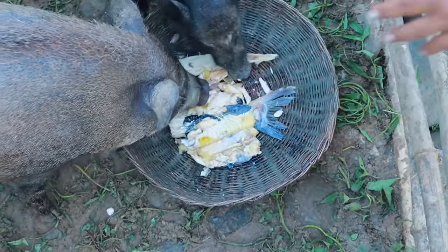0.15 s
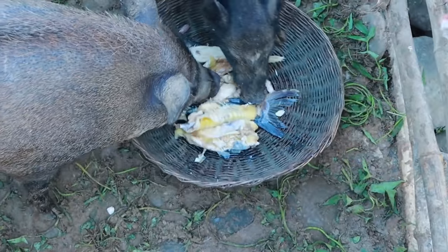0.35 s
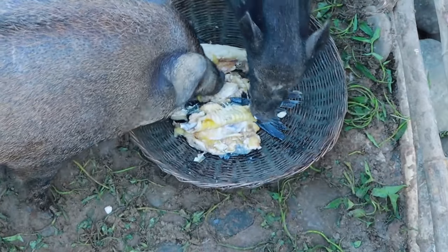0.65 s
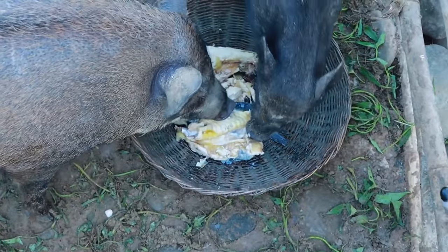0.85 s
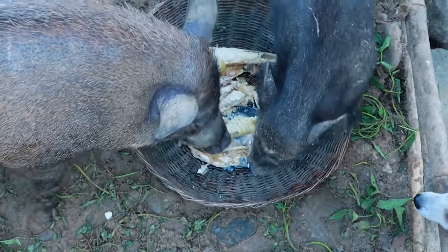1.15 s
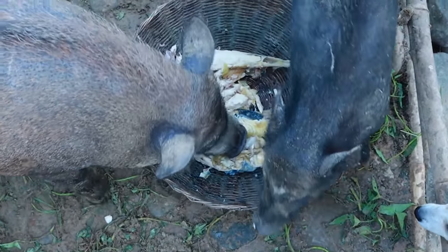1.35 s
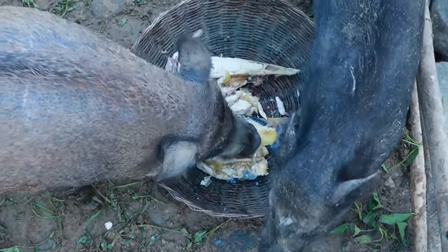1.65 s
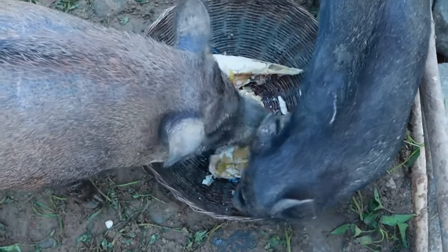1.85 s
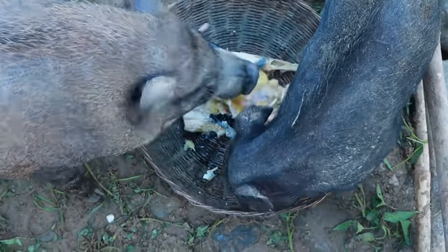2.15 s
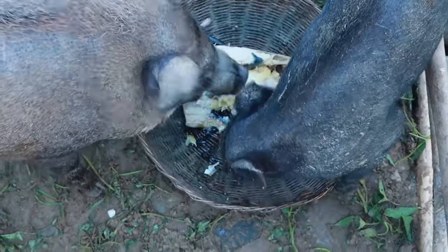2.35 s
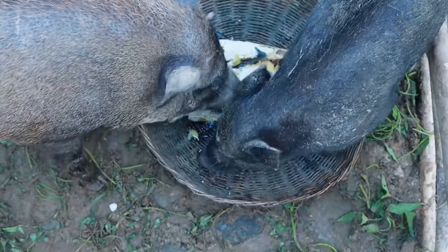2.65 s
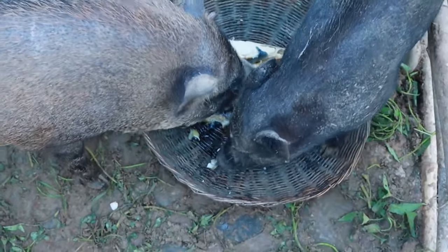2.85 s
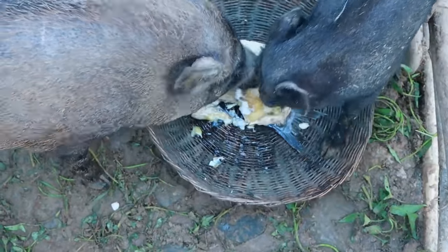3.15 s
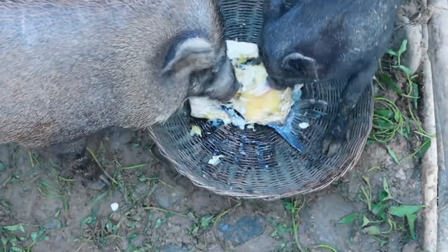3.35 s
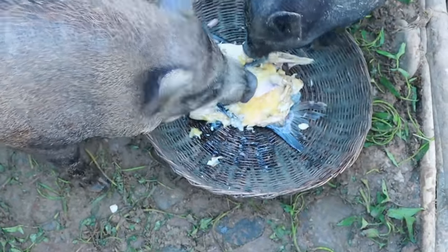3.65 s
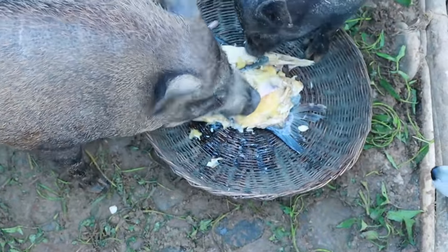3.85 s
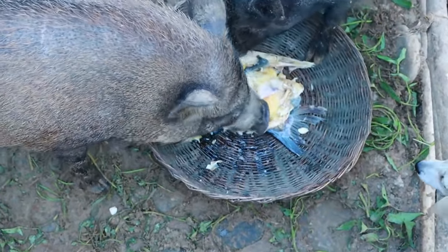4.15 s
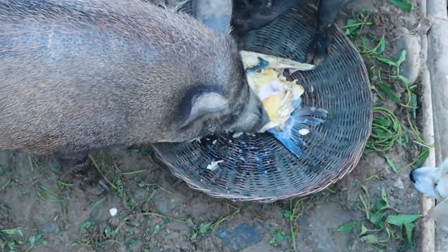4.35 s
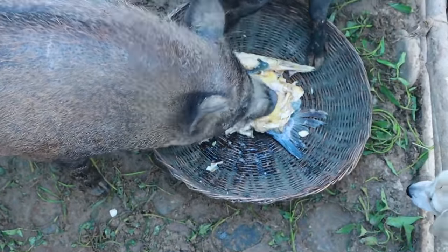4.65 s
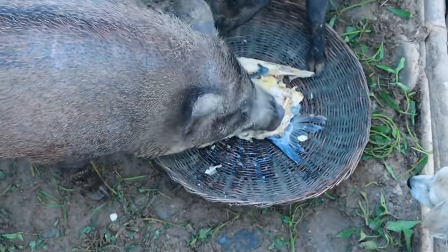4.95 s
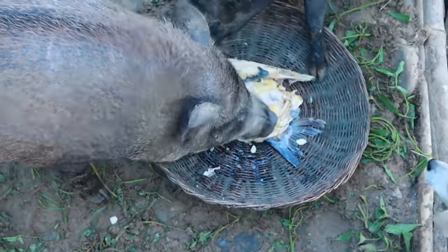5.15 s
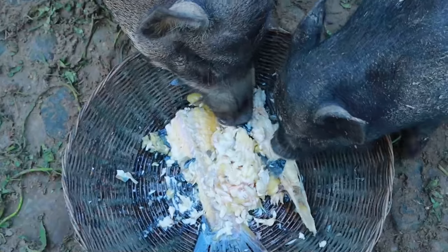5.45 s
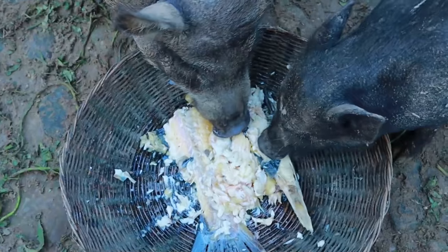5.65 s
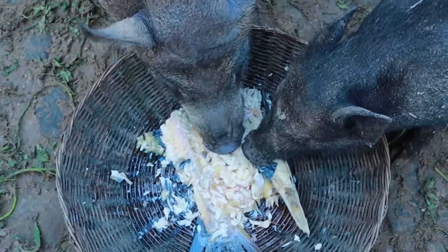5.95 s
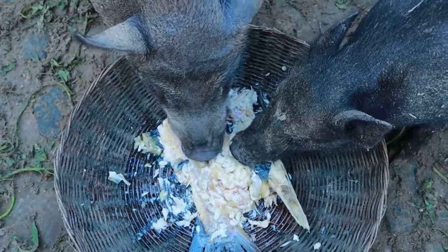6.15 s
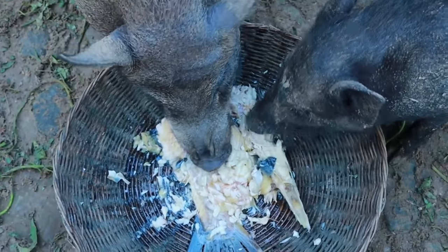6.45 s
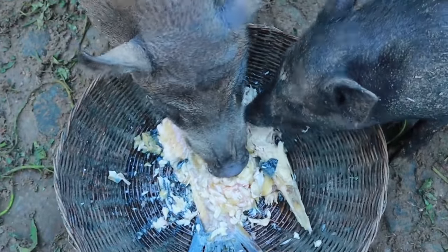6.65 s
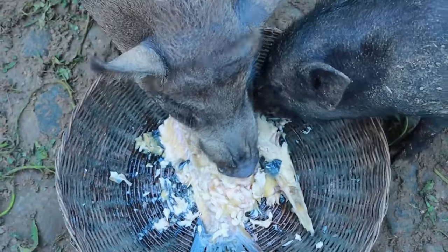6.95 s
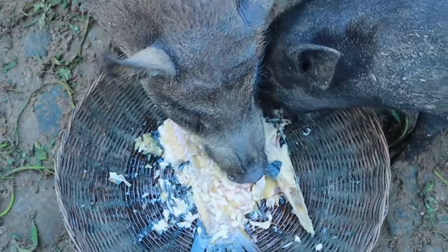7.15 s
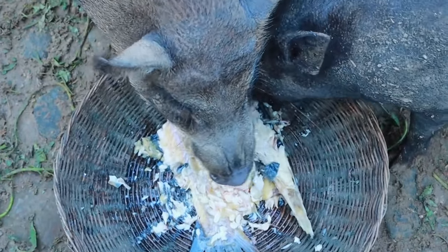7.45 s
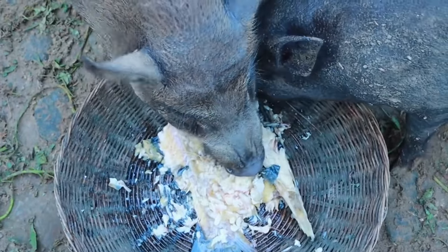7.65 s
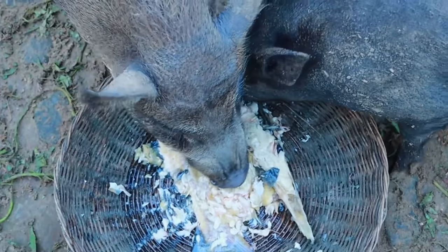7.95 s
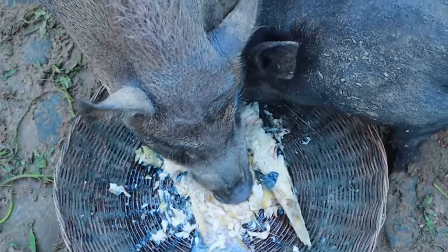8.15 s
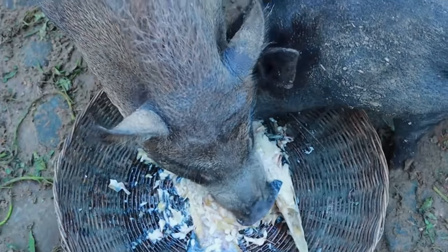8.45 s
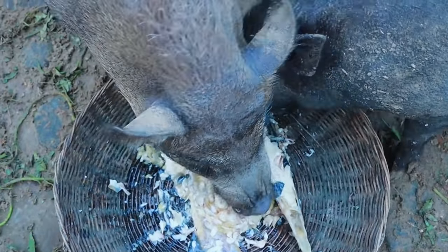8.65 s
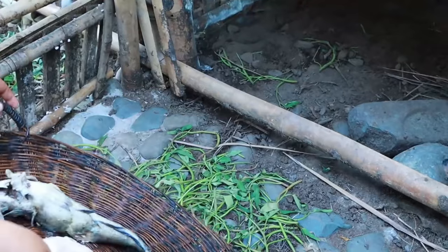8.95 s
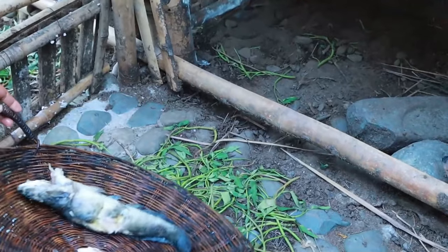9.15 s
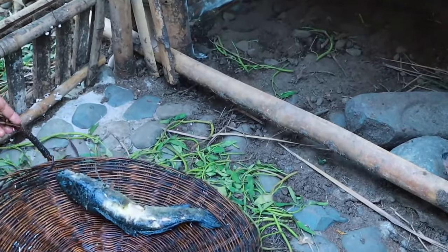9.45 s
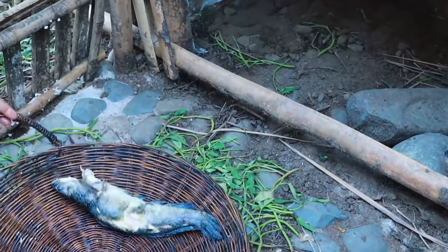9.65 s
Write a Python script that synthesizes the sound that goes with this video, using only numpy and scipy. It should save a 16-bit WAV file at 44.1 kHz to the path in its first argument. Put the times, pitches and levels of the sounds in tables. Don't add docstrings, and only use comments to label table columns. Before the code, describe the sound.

Two pigs chew wet mash with sharp, irregular smacks and slurps while a nearby dog whines in thin, hissing whistles over a soft outdoor wash.

```python
import sys
import numpy as np
from scipy import signal
from scipy.fft import rfft, irfft
from scipy.io import wavfile
from scipy.ndimage import uniform_filter1d

SR = 44100
rng = np.random.default_rng(int(sys.argv[2]) if len(sys.argv) > 2 else 0)


def materialize(psi):
    bounded = np.clip(np.atleast_2d(psi).T, -1, 1)
    quanta = np.round(bounded * 32767).astype(np.int16)
    wavfile.write(sys.argv[1], SR, quanta)


def ratio_of_db(decibels):
    return 10 ** (np.asarray(decibels, float) / 20)


N = 432180

SQUEAK_SECOND_DB, YIP_SECOND_DB = -36.5, -1


def evened(x):
    return x / np.sqrt(np.mean(abs(x) ** 2) + 1e-20)


def read(points, hz):
    f, value = np.transpose(points)
    return np.interp(np.log(hz + 1), np.log(f + 1), value)


def add(mix, s, sound):
    part = mix[round(s * SR):][:len(sound)]
    part += sound[:len(part)]


def wobble(size, width_hz):
    pole = np.exp(-np.pi * width_hz / SR)
    z = rng.standard_normal((size + 500, 2)) @ [1, 1j]
    once = signal.lfilter([1], [1, -pole], z)
    return evened(signal.lfilter([1], [1, -pole], once)[500:])


def coloured(x, points):
    gain = ratio_of_db(read(points, np.fft.rfftfreq(len(x), 1 / SR)))
    return irfft(rfft(x) * gain, len(x))


def band(x, lo_hz, hi_hz):
    return signal.sosfilt(signal.butter(2, [lo_hz, hi_hz], "band", fs=SR, output="sos"), x)


def smack(s, crack_db, pop_db, fizz_db):
    t = np.arange(2000) / SR
    noise, grit = rng.standard_normal(len(t)), rng.exponential(1, len(t))
    bubble_hz = np.clip(1597 - 95 * pop_db, 1300, 4500) * 2 ** (0.35 * rng.random())
    snaps = uniform_filter1d(grit ** 2.6, size=24) + 12 * np.exp(-t / 0.0013)
    tear = noise * snaps * (1 - np.exp(-t / 0.0023))
    crack = band(tear * ratio_of_db(-60 * t / 0.052), 1530, 5350)
    crack = evened(crack) + 0.4 * evened(band(crack, 0.65 * bubble_hz, 1.22 * bubble_hz))
    fizz = band(tear * ratio_of_db(-60 * t / 0.018), 4500, 13300)
    cavity = np.sin(2 * np.pi * rng.uniform(740, 1170) * t) * t * ratio_of_db(-60 * t / 0.0099)
    pop = cavity + 0.0004 * band(noise * ratio_of_db(-60 * t / 0.079), 360, 960)
    parts = crack / abs(crack).max()
    parts += ratio_of_db(pop_db + 0.5) * pop / abs(pop).max()
    parts += ratio_of_db(fizz_db + 14) * fizz / abs(fizz).max()
    return s - .001, ratio_of_db(crack_db) * parts


def mouthfuls():
    # start_s, peak_db
    bites = [(0.365, -12), (1.2523, -15.5), (2.37, -16), (3.769, -3), (3.8186, -12), (3.959, -12.5),
             (4.4876, -7.5), (4.728, -16.5), (4.9988, -13.5), (5.0713, -16), (5.2392, -6), (5.4204, -13.5),
             (5.7743, -16), (5.8941, -8), (6.1599, -15), (6.319, -16), (6.6358, -9), (6.8165, -16),
             (7.096, -16.5), (7.1644, -11.5), (7.3298, -10.5), (7.355, -24), (7.3846, -11), (7.6014, -9),
             (7.7402, -11.5), (7.8104, -16), (7.9834, -12), (7.9997, -16), (8.2945, -14.5), (8.5202, -11.5)]
    # start_s, peak_db, mouth_pop_db
    lip_pops = [(0.3342, -12.5, -4.5), (0.3854, -15.5, -3), (0.414, -16, 6.5), (1.04, -18.5, 8),
                (1.9111, -11.5, -5), (2.204, -19, -5), (2.2854, -7, -7.5), (2.4897, -15, 0),
                (2.9736, -20, 3), (3.1712, -15, -7.5), (3.23, -17, 3.5), (3.7387, -16, -1),
                (3.7814, -23, 3), (3.9305, -16, -3), (3.9749, -9, -6), (3.9976, -9.5, 0.5),
                (4.0198, -18, 4), (4.6436, -16.5, -8), (4.7694, -5.5, -14), (4.7812, -14.5, 7),
                (5.018, -16.5, 5.5), (5.4323, -9.5, -9.5), (6.6107, -17, -5), (6.6495, -12.5, -1.5),
                (7.676, -6, -5.5), (7.694, -4.5, -4), (7.8912, -6, -6.5), (7.9134, -14.5, -0.5),
                (9.1686, -15.5, -8.5), (9.4621, -14, -3)]
    # start_s, peak_db
    slurps = [(0.327, -20), (0.9142, -21), (1.0884, -22), (1.7636, -10), (1.7734, -25), (1.905, -16),
              (4.0044, -9.5), (5.2546, -13), (5.7006, -14.5), (5.8087, -24), (7.8997, -26), (8.7221, -17.5),
              (9.7228, -22.5)]
    dry_fizz_db, wet_fizz_db, fizz_spread_db = -27.5, -20.5, 4.5
    bite_pop_db, slurp_pop_db = -15.5, -3
    rows = [(s, db, bite_pop_db, dry_fizz_db) for s, db in bites]
    rows += [(*row, dry_fizz_db) for row in lip_pops]
    rows += [(s, db, slurp_pop_db, wet_fizz_db) for s, db in slurps]
    chance = rng.standard_normal((len(rows), 1))
    rows = np.array(rows) + fizz_spread_db * chance * [0, 0, 0, 1]
    return [smack(*row) for row in rows]


def chewing():
    # time_s, level_db
    mash_course = [(0, -38), (1.2, -38), (2.9, -37.5), (4.3, -37), (5.5, -36.5), (6.5, -36), (6.95, -32.5),
                   (7.5, -33.5), (8.5, -33), (8.9, -41), (9.8, -42.5)]
    # pitch_hz, level_db
    bubble_sizes = [(2200, -5), (3600, -14.5), (5500, -11.5), (8500, -23), (11000, -24)]
    # frequency_hz, level_db
    mash_spectrum = [(300, -43), (900, 11), (2000, -1), (3500, -0.5), (6000, -7.5), (10000, -23.5),
                     (16000, -24.5)]
    s, level_db = np.transpose(mash_course)
    clumps = ratio_of_db(7.3 * wobble(N, 34).real + 1.9 * wobble(N, 230).real)
    mash = evened(coloured(rng.standard_normal(N) * clumps, mash_spectrum))
    burst = np.exp(-np.arange(200) / 55.0)
    spit = np.zeros(N)
    for hz, db in bubble_sizes:
        strength = ratio_of_db(5.8 * np.minimum(rng.exponential(1, N), 2.4))
        ticks = (rng.random(N) < 22 / SR) * strength
        bursts = signal.oaconvolve(ticks, burst)[:N] * rng.standard_normal(N)
        spit += ratio_of_db(db) * evened(band(bursts, 0.55 * hz, 1.22 * hz))
    return ratio_of_db(np.interp(np.arange(N) / SR, s, level_db)) * (mash + spit)


def thuds():
    # start_s, peak_db, pitch_hz
    rings = [
        (2.489, -54, 328),
        (3.994, -14, 208),
        (4.78, -28, 362),
        (5.766, -24, 214),
        (7.673, -22.5, 250),
        (7.68, -13, 1560),
        (7.697, -8, 1350),
        (9.464, -19, 1500),
    ]
    t = np.arange(4000) / SR
    return [(s, ratio_of_db(peak_db - 60 * t / 0.06 * (hz / 250) ** 0.31) * np.sin(2 * np.pi * hz * t))
            for s, peak_db, hz in rings]


def grunt():
    # time_s, level_db, pitch_hz
    grunt_course = [
        (5.139, -45, 204),
        (5.186, -23.5, 211.4),
        (5.24, -36, 260),
    ]
    s, level_db, hz = np.transpose(grunt_course)
    t = np.arange(s[0], s[-1], 1 / SR)
    a = 2 * np.pi * np.cumsum(np.interp(t, s, hz)) / SR
    note = np.cos(a) + 0.51 * np.cos(1.5 * a) + 0.29 * np.cos(4 * a) + 0.17 * np.cos(3 * a)
    return s[0], 1.36 * ratio_of_db(np.interp(t, s, level_db)) * note * signal.windows.tukey(len(t), .3)


def arch(start, brk, land, hold_db, glide_db, first_hz, top_hz, land_hz, hoarse, half_db):
    climb_s, clearing_s, tail_s = .035, .019, .025
    s = np.arange(start, land + tail_s, .002)
    climb = 1 - np.exp(-(np.minimum(s, brk) - start) / climb_s)
    climb /= 1 - np.exp(-(brk - start) / climb_s)
    fall = np.sin(np.pi / 2 * np.clip((s - brk) / (land - brk), 0, 1)) ** 2
    hz = first_hz + (top_hz - first_hz) * climb + (land_hz - top_hz) * fall
    clears = brk + np.clip(.045 * (half_db + 7.5), 0, .55) * (land - brk)
    peak = clears + .3 * (land - clears)
    settle = clears + .68 * (land - clears)
    level_db = np.interp(s, [start, start + 1.08 * climb_s, clears - clearing_s, peak, land, s[-1]],
                         [hold_db - 4.5, hold_db, hold_db, glide_db, glide_db - 4.5, glide_db - 31.5])
    clear = hoarse * .021 * max(-8 - glide_db, 0)
    loose = clear + .035 * max(half_db + 9.5, 0)
    rough = np.interp(s, [clears - clearing_s, clears + clearing_s / 2, settle, land, s[-1]],
                      [hoarse, clear, clear, loose, .8])
    half_hold_db, half_glide_db = -10, -22
    held_db = half_glide_db + hoarse * (half_hold_db - half_glide_db)
    half = half_db + np.interp(s, [clears - clearing_s, clears, settle, land],
                               [held_db, half_glide_db, half_glide_db, 0])
    return np.transpose([s, hz, level_db, rough, half])


def whine(rows):
    sidebands_db = [12, 16.5, 15, 4, 3.5, 0.5, -1.5, -1, -4.5]
    lowest_share, step_share = .72, .165
    s, *columns = np.transpose(rows)
    t = np.arange(s[0], s[-1], 1 / SR)
    hz, level_db, rough, half_db = (np.interp(t, s, c) for c in columns)
    rough, size = np.clip(rough, 0, 1), len(t)
    shake = (.008 + .09 * rough) * wobble(size, 200).real
    a = np.pi * np.cumsum(hz * (1 + shake)) / SR
    flutter = ratio_of_db(np.minimum((3.0 + 4.0 * rough) * wobble(size, 80).real, 5))
    clean = np.cos(2 * a) + ratio_of_db(-28.0) * np.cos(4 * a) + ratio_of_db(-41) * np.cos(3 * a)
    clean += ratio_of_db(half_db - 3.2 * rough) * np.cos(a)
    clean *= flutter * (1 + .4 * wobble(size, 500).real)
    b = 2 * np.pi * np.cumsum(hz) / SR
    smear = np.zeros(size, complex)
    for k, db in enumerate(sidebands_db):
        line = np.exp(1j * b * (lowest_share + step_share * k)) * wobble(size, 650)
        smear += ratio_of_db(db + 3.5 * wobble(size, 50).real) * line
    half = ratio_of_db(half_db + 1.8 * wobble(size, 90).real) * np.exp(1j * a) * wobble(size, 880)
    rasp = ratio_of_db(2.8 * wobble(size, 150).real)
    steady = (1 - rough) ** 2
    voice = np.sqrt(2) * (steady * clean + rough * rasp * (evened(smear) + half).real)
    return s[0], ratio_of_db(level_db) * voice * signal.windows.tukey(size, .025 * SR / size)


def whines():
    # start_s, pitch_break_s, glide_landing_s, held_level_db, glide_level_db
    efforts = [(0.399, 0.48, .527, -24.5, -13.5), (1.08, 1.131, 1.14, -27.5, -14.5),
               (1.13, 1.14, 1.162, -17, -14), (1.72, 1.787, 1.84, -23.5, -18),
               (2.205, 2.277, 2.34, -22, -14.5), (2.36, 2.447, 2.53, -19, -13.5),
               (2.524, 2.634, 2.705, -18, -15.5), (2.699, 2.717, 2.765, -15, -16),
               (2.749, 2.832, 2.895, -15.5, -17.5), (3.543, 3.603, 3.635, -20.5, -15),
               (3.626, 3.674, 3.69, -24.5, -37), (4.486, 4.541, 4.645, -17.5, -18.5),
               (4.859, 4.912, 5.02, -25.5, -30), (5.186, 5.276, 5.36, -22, -20),
               (5.573, 5.612, 5.645, -24, -21.5), (5.894, 5.948, 6.0, -21, -16),
               (6.342, 6.39, 6.45, -24.5, -20), (6.654, 6.698, 6.765, -24, -23),
               (7.145, 7.202, 7.275, -32, -17.5), (7.601, 7.666, 7.73, -21.5, -18),
               (8.097, 8.159, 8.228, -21, -16), (8.811, 8.848, 8.93, -34.5, -23.5),
               (8.78, 8.803, 8.82, -27.5, -29), (4.931, 4.965, 4.98, -32, -40)]
    # first_hz, top_hz, landing_hz, hoarseness (0-1), half_pitch_line_at_landing_db
    fold_states = [(4900, 7000, 5100, 1.05, -17), (6900, 6600, 6300, 0.87, -25),
                   (5440, 5400, 4850, 0.5, -6), (4500, 6100, 4900, .85, 6), (5000, 7150, 4900, 0.96, -20),
                   (5630, 8100, 7500, 0.83, -17), (7360, 7700, 6800, 0.79, -25), (6800, 6780, 6770, 0, -34),
                   (6800, 7700, 4200, 0.5, -10), (3910, 5600, 4900, 0.73, 0.5),
                   (5900, 5700, 7400, 1.02, 15.5), (4600, 5800, 4300, 0.88, -0.5),
                   (4800, 6000, 4600, 1.02, 4), (6210, 6300, 4450, 0.79, 7.5), (5400, 5420, 4300, .15, 11),
                   (4430, 4950, 4600, 0.76, 3), (4200, 4600, 4400, 0.83, 10.5),
                   (5220, 7380, 4600, 0.8, 6.5), (5000, 7800, 4900, 1, 4), (3950, 7100, 4550, .95, -12),
                   (3690, 7900, 4500, 0.84, -8.5), (6550, 7400, 4700, 0.84, -4.5),
                   (5970, 6200, 6400, 0.43, -20), (5900, 5700, 5300, 0.97, 24)]
    return [whine(arch(*effort, *state)) for effort, state in zip(efforts, fold_states)]


def squeak(s, length, start_hz, end_hz, level_db, second_db):
    u = np.linspace(0, 1, round(length * SR))
    hz = (start_hz + (end_hz - start_hz) * u) * (1 + 0.016 * wobble(len(u), 110).real)
    turn = np.exp(2j * np.pi * np.cumsum(hz) / SR)
    note = turn + ratio_of_db(second_db) * turn ** 2 + ratio_of_db(second_db - 10) * turn ** 3
    note = note + ratio_of_db(.4 * second_db) * note * wobble(len(u), 700)
    level = ratio_of_db(level_db + 3.5 * wobble(len(u), 100).real)
    return s, np.sqrt(2) * level * note.real * signal.windows.tukey(len(u), .3)


def squeaks_and_yips():
    # start_s, length_s, start_hz, end_hz, level_db
    thin_squeaks = [(1.155, 0.033, 2726, 2500, -12.5), (1.198, 0.013, 2650, 2620, -43),
                    (3.578, 0.027, 7840, 7800, -34), (3.618, 0.017, 7400, 7260, -33),
                    (3.623, 0.066, 3336, 2980, -19), (6.246, 0.15, 3320, 3060, -36.5),
                    (6.569, 0.078, 3730, 3310, -32.5), (6.406, 0.038, 6840, 6740, -31),
                    (7.266, 0.028, 3200, 2940, -27), (7.579, 0.032, 3170, 3240, -31),
                    (7.604, 0.13, 3475, 3320, -33.5), (7.918, 0.1, 3460, 3180, -33.5),
                    (8.101, 0.063, 1345, 1210, -32), (8.189, 0.044, 1180, 1100, -20),
                    (8.317, 0.07, 1323, 1265, -27.5), (8.393, 0.054, 2970, 2580, -30),
                    (8.569, 0.048, 1135, 1056, -25), (9.676, 0.068, 4600, 4500, -45),
                    (1.725, 0.017, 4500, 5200, -27), (2.362, 0.016, 5400, 7500, -20),
                    (2.86, 0.029, 5900, 4260, -16.5), (3.56, 0.028, 4200, 5000, -24.5),
                    (8.102, 0.032, 4200, 4900, -23.5), (5.905, 0.026, 2350, 2440, -21.5)]
    # start_s, length_s, start_hz, end_hz, level_db
    reedy_yips = [(3.629, 0.06, 2315, 1550, -32.5), (5.62, 0.061, 2380, 1470, -36),
                  (5.986, 0.036, 2260, 1325, -29.5), (6.751, 0.033, 2200, 1714, -29),
                  (7.288, 0.055, 1900, 1630, -32.5), (7.805, 0.031, 1806, 1480, -27),
                  (8.29, 0.036, 1898, 1544, -25.5), (8.402, .05, 2160, 1628, -29)]
    thin = [squeak(*row, SQUEAK_SECOND_DB) for row in thin_squeaks]
    return thin + [squeak(*row, YIP_SECOND_DB) for row in reedy_yips]


def cricket():
    # first_pair_s, pairs (count)
    bouts = [
        (.125, 1),
        (2.09, 1),
        (4.135, 5),
    ]
    pitch_hz, level_db, chirp_s, pair_s, every_s = 7800, -52.5, 0.022, .055, .222
    return [squeak(s + k * every_s + gap, chirp_s, pitch_hz, pitch_hz, level_db, SQUEAK_SECOND_DB)
            for s, pairs in bouts for k in range(pairs) for gap in (0, pair_s)]


def yard():
    # frequency_hz, density_db (dB per Hz)
    wash_spectrum = [(15, -1), (25, -23), (55, -46), (90, -13.5), (200, -7), (600, -5), (740, -4.5),
                     (880, 2.5), (1030, -5.5), (1250, -9.5), (1600, -13.5), (3500, -15), (4500, -25),
                     (13900, -40)]
    frames, hz = N // 256 + 5, np.fft.rfftfreq(1024, 1 / SR)
    a, b, patches = rng.standard_normal((frames, 513, 3)).T
    patches = uniform_filter1d(patches, size=10, axis=0)
    patches = evened(uniform_filter1d(patches, size=8, axis=1))
    z = (a + 1j * b) * ratio_of_db(read(wash_spectrum, hz)[:, None] + 1.77 * patches)
    return evened(signal.istft(z, nperseg=1024, noverlap=768)[1][:N])


def pen(x):
    t = np.arange(SR // 4) / SR
    tail = rng.standard_normal(len(t)) * ratio_of_db(-60 * t / .17) * (t > .006)
    return ratio_of_db(-11.5) * signal.fftconvolve(x, tail / np.linalg.norm(tail))[:N]


def scene():
    # start_s, end_s
    shot_spans = [
        (0, 5.444),
        (5.499, 8.75),
        (8.782, 9.9),
    ]
    wash_levels = [
        -29.5,
        -31,
        -33,
    ]
    near, t = np.zeros(N), np.arange(N) / SR
    for event in mouthfuls() + thuds() + [grunt()] + whines() + squeaks_and_yips() + cricket():
        add(near, *event)
    action = near + pen(near) + chewing()
    wash = yard()
    mix = np.zeros(N)
    for (start, end), db in zip(shot_spans, wash_levels):
        mix += (t > start) * (t < end) * (action + ratio_of_db(db) * wash)
    return mix[None]


def top_cut(x):
    return signal.sosfilt(signal.butter(12, 16500, fs=SR, output="sos"), x)


def record(dry):
    edge = signal.firwin(511, 16050, window=("kaiser", 9), fs=SR)
    limited = signal.oaconvolve(dry, edge[None], "same")
    held = 1.1 * np.tanh(limited / 1.1)
    return top_cut(held)


dry = scene()
out = record(dry)
materialize(out)
```